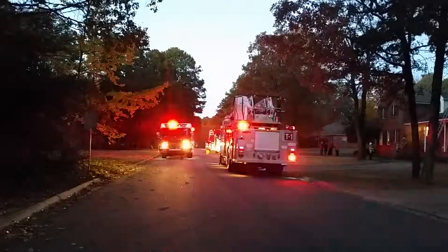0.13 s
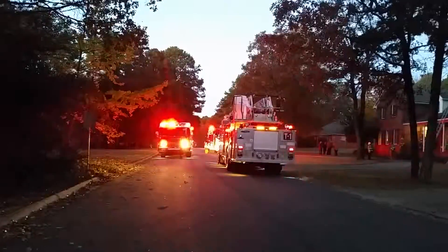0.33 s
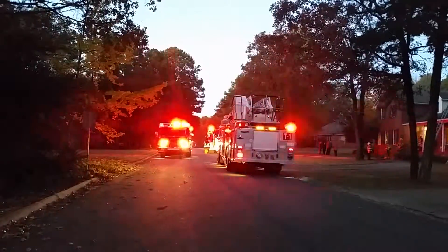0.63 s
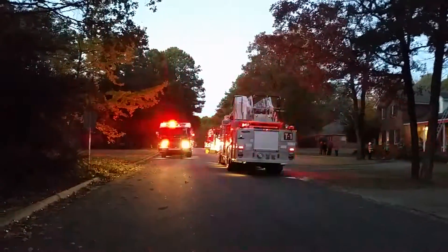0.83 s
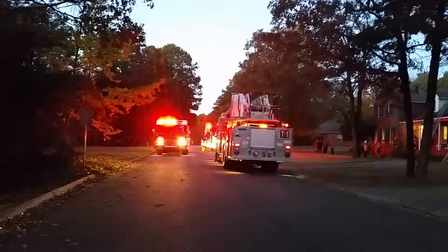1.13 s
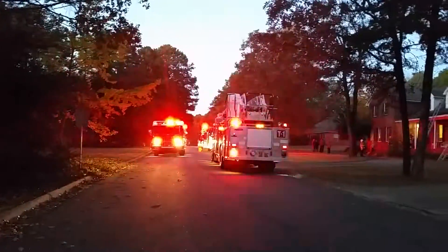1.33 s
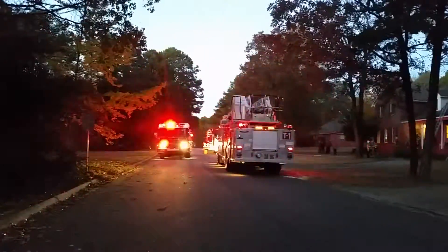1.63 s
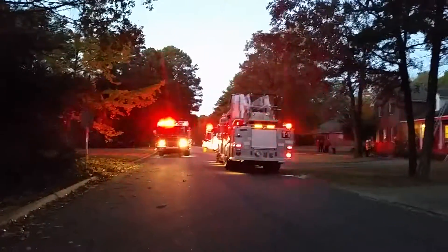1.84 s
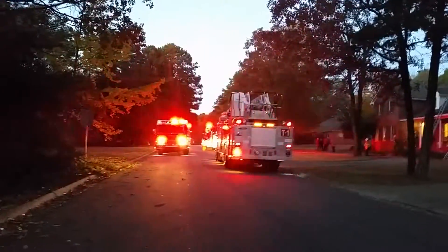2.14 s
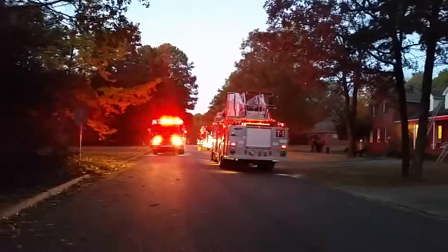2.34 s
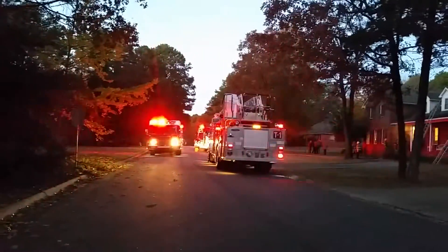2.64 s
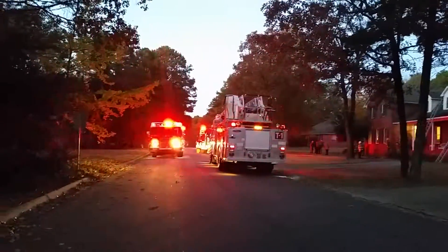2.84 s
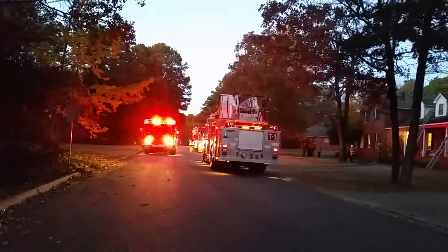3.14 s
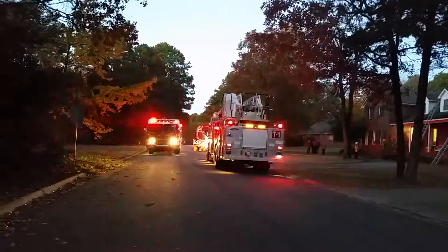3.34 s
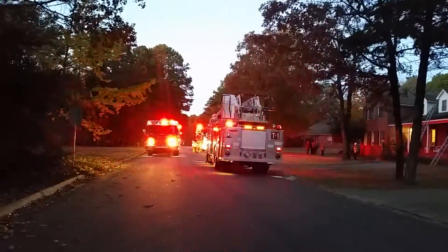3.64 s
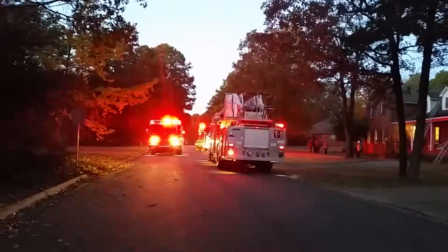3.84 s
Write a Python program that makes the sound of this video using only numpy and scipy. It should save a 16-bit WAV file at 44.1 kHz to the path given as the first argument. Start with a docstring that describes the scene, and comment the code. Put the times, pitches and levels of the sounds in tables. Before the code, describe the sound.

Steady idling of several large diesel truck engines outdoors, throbbing bass under broad airy roar

```python
"""Three heavy diesel trucks idle some thirty metres down a quiet street, each at its own speed.
Exhaust orders beat in the bass as sines on multiples of each engine cycle or fan shaft.
The nearest engine knocks as clicks ring its block; its gears whine as higher sines.
Fans and intake roar and air hisses as coloured noise, with a faint turbo whistle of narrow noise.
A phone with two microphone ports hears them, and the sound fades in after a short silence."""
import sys
import numpy as np
from scipy import signal
from scipy.fft import rfft, irfft, next_fast_len
from scipy.io import wavfile

SR = 44100
rng = np.random.default_rng(int(sys.argv[2]) if len(sys.argv) > 2 else 0)


def int16_out(signal):
    """Quantize to a 16-bit WAV file."""
    q = np.round(np.clip(np.atleast_2d(signal).T, -1, 1) * 32767)
    wavfile.write(sys.argv[1], SR, q.astype(np.int16))


def voltage_ratio(level):
    """Linear amplitude factor for a level in decibels (scalar or array-like)."""
    return 10 ** (np.asarray(level, float) / 20)


N = 176400   # samples, 4 s


def rms_one(x):
    """Scale to rms 1."""
    return x / np.sqrt(np.mean(x ** 2) + 1e-20)


def at_hz(points, hz):
    """Read a table on a log-frequency axis."""
    table_hz, value = np.array(points).T
    return np.interp(np.log(hz + 1e-3), np.log(table_hz), value)


def over_time(points):
    """Gain at every sample, from a table of seconds and dB."""
    return voltage_ratio(np.interp(np.arange(N) / SR, *np.transpose(points)))


def drift(rate_hz):
    """Slow random movement of spread 1: noise through two equal low-pass poles, one value per 40 samples."""
    r = np.exp(-2 * np.pi * rate_hz * 40 / SR)
    noise = rng.standard_normal(N // 40 + 4002)
    slow = signal.lfilter([1], [1, -2 * r, r * r], noise)[4000:]   # drop the filter's start-up
    slow = rms_one(slow - slow.mean())
    return np.interp(np.arange(N) / 40, np.arange(len(slow)), slow)


def resonance(x, hz, width_hz):
    """Two-pole resonance, gain 1 on top."""
    r = np.exp(-np.pi * width_hz / SR)
    gain = (1 - r * r) / 2
    return signal.lfilter([gain, 0, -gain], [1, -2 * r * np.cos(2 * np.pi * hz / SR), r * r], x)


SPEED_WANDER = .0008   # spread of the speed, as a fraction


def turns(cycle_hz):
    """Cycles completed by a shaft whose governed speed wanders slightly."""
    return np.cumsum(cycle_hz * (1 + SPEED_WANDER * drift(1.65))) / SR


def tones(cycles, orders, levels_db, waver_db):
    """Sines on multiples of a shaft's speed, each wavering in level on its own."""
    total = np.zeros(N)
    for order, db in zip(orders, levels_db):
        level = np.sqrt(2) * voltage_ratio(db + waver_db * drift(3.0))
        total += level * np.sin(2 * np.pi * (order * cycles + rng.random()))
    return total


NEAR_CYCLE_HZ = 5.8795   # four-stroke cycles per second of the nearest engine
# Exhaust of the nearest engine. Each entry: multiple of the four-stroke cycle [ratio].
NEAR_ORDERS = [3, 4, 6, 8, 12, 13, 14, 15, 16, 18, 20, 22, 24, 26, 28, 36]
# Each entry: level of that exhaust order [dB rms].
NEAR_DB = [-62, -44, -52, -53, -39.5, -53, -46, -48, -51, -37.5, -45, -53, -54, -56, -51, -55]


def near_exhaust(near_cycles):
    """Exhaust pulses repeat with the engine cycle, so their energy sits on its multiples."""
    return tones(near_cycles, NEAR_ORDERS, NEAR_DB, waver_db=.8)


FIRST_FIRING_S = .003
KNOCK_SCATTER_DB, KNOCK_JITTER_S = 1.5, .0002   # spread from blow to blow
# Strength of the six cylinders in firing order. Each entry: level of the click [dB].
CYLINDER_DB = [2.5, 0.5, -8, 0, 2.5, -0.5]


def firings(near_cycles):
    """One click per firing, six a cycle, its strength set by the cylinder and by chance."""
    count = np.floor(6 * (near_cycles - NEAR_CYCLE_HZ * FIRST_FIRING_S)).astype(int)
    at = np.flatnonzero(np.diff(count)) + 1
    luck = rng.standard_normal((len(at), 2))
    jitter = (luck[:, 0] * KNOCK_JITTER_S * SR).astype(int)
    strength_db = np.array(CYLINDER_DB)[count[at] % 6] + KNOCK_SCATTER_DB * luck[:, 1]
    clicks = np.zeros(N)
    clicks[np.clip(at + jitter, 0, N - 1)] = voltage_ratio(strength_db)
    return clicks


KNOCK_DB, KNOCK_SOFT_HZ = -43, 1500   # rms level; low-pass that softens the edge of the blow
# Ringing of the engine block under each firing.
# Each row: resonance [Hz], width [Hz], relative level before the width scaling [dB].
BLOCK = [(750, 100, 7), (917, 35, 10.5), (1043, 34, 13), (1380, 570, -3), (1920, 400, 1.5)]


def block_knock(clicks):
    """Soft-edged combustion blows ring the resonances of the engine block."""
    soften = signal.butter(2, KNOCK_SOFT_HZ, fs=SR, output="sos")
    blows = signal.sosfilt(soften, clicks + 1e-18)
    ringing = np.zeros(N)
    for k, (hz, width_hz, db) in enumerate(BLOCK):
        sign = (-1) ** k   # neighbouring resonances in opposite polarity
        ringing += sign * voltage_ratio(db) * resonance(blows, hz, width_hz) / np.sqrt(width_hz)
    return voltage_ratio(KNOCK_DB) * rms_one(ringing)


# Gear train and block tones of the nearest engine. Each entry: multiple of its four-stroke cycle [ratio].
WHINE_ORDERS = [111, 122, 128, 134, 152, 168, 171, 179, 201, 233.2]
# Each entry: level of that tone [dB rms].
WHINE_DB = [-54, -48, -52, -53, -44, -54, -51.5, -53, -55, -51.5]


def gear_whine(near_cycles):
    """Gear and block tones keep to high multiples of the same engine cycle."""
    return tones(near_cycles, WHINE_ORDERS, WHINE_DB, waver_db=1.5)


FAR_CYCLE_HZ = 8.16
# Exhaust of the faster engine. Each entry: multiple of its cycle [ratio].
FAR_ORDERS = [6, 9, 12, 15, 18]
# Each entry: level of that exhaust order [dB rms].
FAR_DB = [-40, -48, -38, -54, -50]


def far_exhaust():
    """A second engine idles faster, so its exhaust orders beat against those of the nearest."""
    return tones(turns(FAR_CYCLE_HZ), FAR_ORDERS, FAR_DB, waver_db=.7)


FAN_SHAFT_HZ = 16.515
# Seven-bladed fan of the third truck. Each entry: multiple of its shaft speed [ratio].
FAN_ORDERS = [6.02, 7, 14, 19.07]
# Each entry: level of that tone [dB rms].
FAN_DB = [-41, -37.5, -37, -52]


def fan_hum():
    """Seven passing blades sound at seven times the shaft speed and its double, with two other tones."""
    return tones(turns(FAN_SHAFT_HZ), FAN_ORDERS, FAN_DB, waver_db=.7)


WHISTLE_HZ, WHISTLE_WIDTH_HZ = 6310, 25   # the width is that of each of two passes
WHISTLE_DB, WHISTLE_WAVER_DB = -68, 3   # level around which it wavers, spread of the waver


def turbo_whistle():
    """Faint turbo whistle: noise squeezed twice through one narrow resonance, wavering in level."""
    breath = rng.standard_normal(N)
    for _ in range(2):
        breath = resonance(breath, WHISTLE_HZ, WHISTLE_WIDTH_HZ)
    return voltage_ratio(WHISTLE_DB + WHISTLE_WAVER_DB * drift(1.2)) * rms_one(breath)


CLATTER_DEPTH, CLATTER_DECAY_S = .065, 0.0068   # rms of the swell; time constant of its rise and fall


def clatter(clicks):
    """Swell around each firing, rising and falling exponentially, that will modulate the noise."""
    bump = np.exp(-abs(np.arange(-SR // 20, SR // 20)) / (CLATTER_DECAY_S * SR))
    swell = signal.fftconvolve(clicks, bump, "same")
    return CLATTER_DEPTH * rms_one(swell - swell.mean())


# Bodywork and ducts that colour the air noise. Each row: resonance [Hz], width [Hz], lift at its top [dB].
DUCTS = [(155.6, 22, 2), (272, 15.6, 2.5), (313, 13, 5), (376, 26, 3), (505, 30, 3.5), (611, 120, 0),
         (1041, 110, 0.5), (1463, 42, 4.5), (1822, 33, 4), (2060, 100, 2), (2680, 53, 3), (3120, 180, 3),
         (3530, 200, 1.5), (4010, 95, 2)]


def air(spectrum, swell, patchy_db):
    """Stereo noise of rms 1 in octave bands that flicker on their own; treble swells most with firings."""
    hz = np.arange(N // 2 + 1) * SR / N
    white = rng.standard_normal((3, N))
    colour_db = at_hz(spectrum, hz)
    for top_hz, width_hz, lift_db in DUCTS:
        colour_db = colour_db + lift_db / (1 + (2 * (hz - top_hz) / width_hz) ** 2)
    colour = rfft(ports(white[0], white[1:])) * voltage_ratio(colour_db)
    out, together = 0, drift(3.8)
    for centre_hz in 20 * 2. ** np.arange(11):
        octaves_off = np.clip(np.log2(hz / centre_hz + 1e-9), -1, 1)
        band = irfft(colour * np.cos(np.pi / 2 * octaves_off) ** 2, N)
        gate = 1 + swell * min(centre_hz / 1200, 1)
        flicker = voltage_ratio(patchy_db * (0.32 * together + drift(12.3)))
        out = out + band * gate * flicker
    return out / np.sqrt(np.mean(out.mean(axis=0) ** 2))   # rms 1 in the mean of both ports


# Spectrum of fans and intake. Each row: frequency [Hz], relative density [dB per Hz].
ROAR = [(12, -41), (20, -26), (60, -10.5), (105, -7.5), (142, -10.5), (190, -9.5), (250, -11.5), (275, -12),
        (300, -15), (383, -14.5), (502, -15.5), (555, -17.5), (729, -13.5), (870, -16), (1030, -16),
        (1140, -19), (1500, -20), (1700, -23), (2050, -24), (2280, -27), (3000, -30.5), (3560, -28.5),
        (4100, -33), (4500, -36), (5500, -37), (6300, -37.5), (7500, -40.5), (8300, -46), (8700, -87),
        (16500, -120)]
# Level of the roar. Each row: time [s], rms of the mean of both ports [dB].
ROAR_LEVEL = [(.8, -31), (1.6, -31), (2.6, -31), (4.0, -31.5)]


def fan_roar(swell):
    """Turbulent air in fans and intake makes a broad roar."""
    return over_time(ROAR_LEVEL) * air(ROAR, swell, patchy_db=.5)


# Spectrum of the air hiss in the treble. Each row: frequency [Hz], relative density [dB per Hz].
HISS = [(8000, -53), (9300, -5.5), (10000, -7), (11000, -4.5), (12300, -1), (13500, -1.5), (14600, -9)]
# Level of the hiss. Each row: time [s], rms of the mean of both ports [dB].
HISS_LEVEL = [(0.8, -53.5), (1.95, -54), (3.62, -53), (4.0, -53)]


def air_hiss(swell):
    """Air hiss in the treble, swelling half as deeply as the roar."""
    return over_time(HISS_LEVEL) * air(HISS, .5 * swell, patchy_db=-0.45)


# Level difference of left and right. Each row: frequency [Hz], left over right [dB]. Around 7 to 8 kHz the
# right channel is nearly empty.
CHANNEL_BALANCE = [(40, 1), (110, 2), (260, 4.5), (430, 6.5), (600, 8), (800, 4), (1100, 8), (1400, 12.5),
                   (1800, 11), (2200, 9), (2800, 9), (3600, 1), (4700, -3.5), (5400, -5), (6200, 5.5),
                   (7000, 49), (8200, 47), (9600, 28), (10800, -4), (14000, -5)]
# Phase difference of the two ports. Each row: frequency [Hz], lead of the left [radians].
PORT_LEAD = [(20, 0.8), (60, 0.45), (100, 0.34), (230, 0.56), (600, 0.29), (950, 0.99), (1500, 1.63),
             (1800, 1.9), (2200, -0.74), (2900, -1.58), (4100, 1.82), (14000, 0.71)]
# Likeness of the ports for diffuse sound. Each row: frequency [Hz], share of power common to both [0 to 1].
PORT_COMMON = [(20, 1.0), (250, 0.96), (430, 0.92), (800, 0.69), (1300, 0.36), (1600, 0.44), (2000, 0.97),
               (2800, 0.11), (4500, 0.17), (6000, .08), (14000, 0.065)]


def ports(direct, diffuse=None):
    """Left and right differ in level and phase; diffuse sound is unrelated between them."""
    size = next_fast_len(N + SR // 2)
    hz = np.arange(size // 2 + 1) * SR / size
    edge = ((0, 0), (0, size - N))
    pair = rfft(np.pad(np.array([direct] * 2), edge, mode="reflect"))
    if diffuse is not None:
        common = np.clip(at_hz(PORT_COMMON, hz), 0, 1)
        unrelated = rfft(np.pad(diffuse, edge, mode="reflect"))
        pair = np.sqrt(common) * pair + np.sqrt(1 - common) * unrelated
    # each port takes half of the difference
    half = np.sqrt(voltage_ratio(at_hz(CHANNEL_BALANCE, hz))) * np.exp(.5j * at_hz(PORT_LEAD, hz))
    gains = np.array([half, 1 / half])
    return irfft(pair * gains / abs(gains.mean(axis=0)), size)[:, :N]


def scene():
    """Engines, fan, whistle and air noise at the two ports."""
    near_cycles = turns(NEAR_CYCLE_HZ)
    clicks = firings(near_cycles)
    near = near_exhaust(near_cycles) + block_knock(clicks) + gear_whine(near_cycles)
    direct = near + far_exhaust() + fan_hum() + turbo_whistle()
    swell = clatter(clicks)
    return ports(direct) + fan_roar(swell) + air_hiss(swell)


def band_limit(x):
    """A steep low-pass at the top of the band."""
    return signal.sosfilt(signal.butter(12, 14410, fs=SR, output="sos"), x)


FADE_START_S, FADE_LENGTH_S, FADE_POWER = .418, 0.32, 0.92


def record(dry):
    """Silence, then a nearly straight fade-in to the full scene."""
    progress = (np.arange(N) / SR - FADE_START_S) / FADE_LENGTH_S
    fade = np.clip(progress, 0, 1) ** FADE_POWER
    return band_limit(dry * fade)


dry = scene()
out = record(dry)
int16_out(out)
```